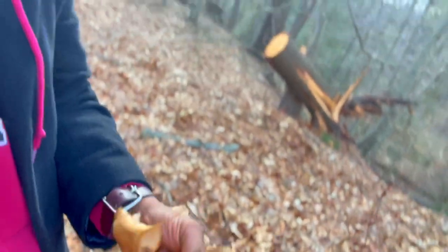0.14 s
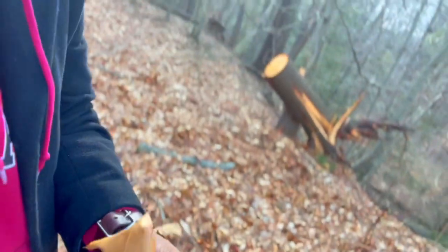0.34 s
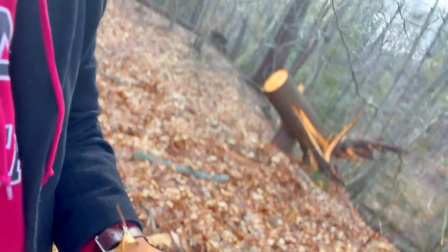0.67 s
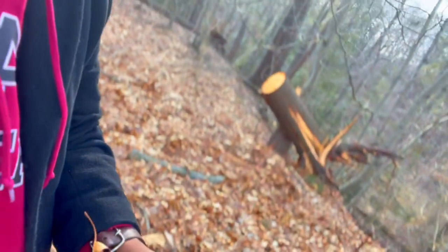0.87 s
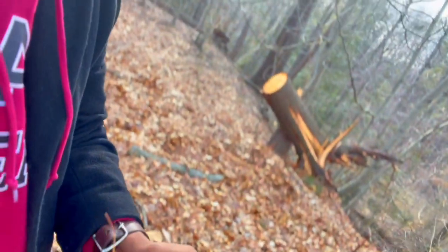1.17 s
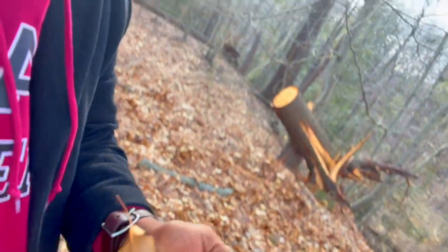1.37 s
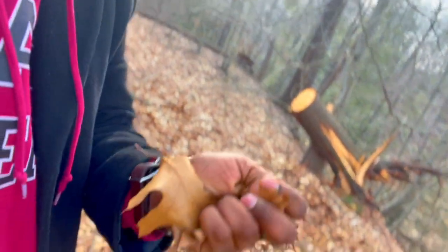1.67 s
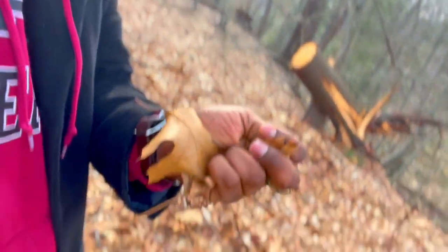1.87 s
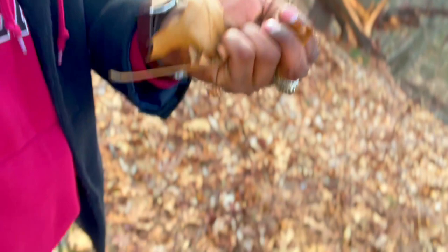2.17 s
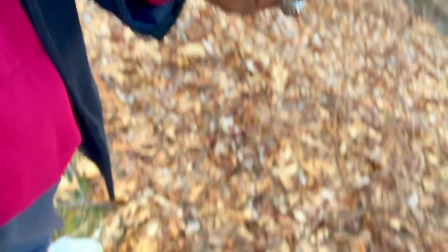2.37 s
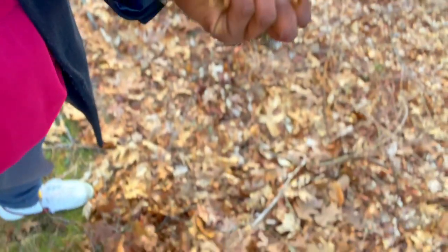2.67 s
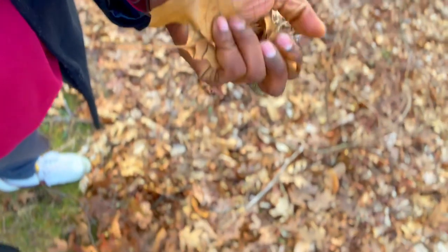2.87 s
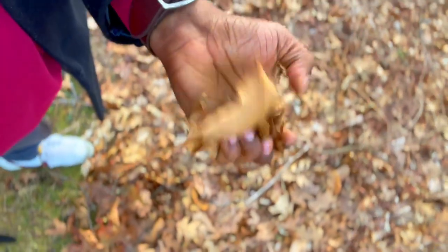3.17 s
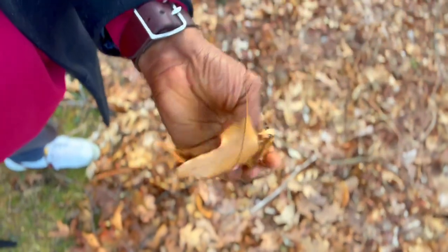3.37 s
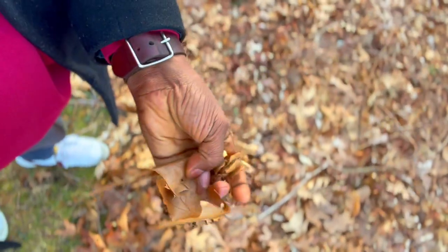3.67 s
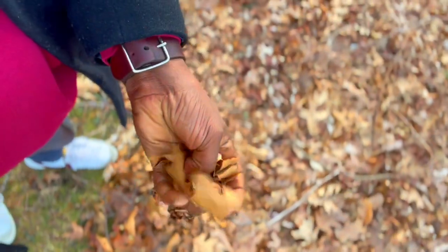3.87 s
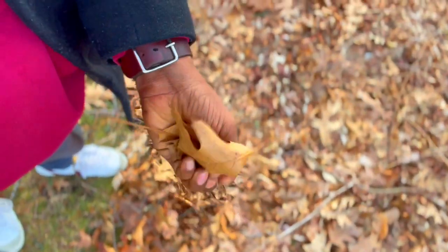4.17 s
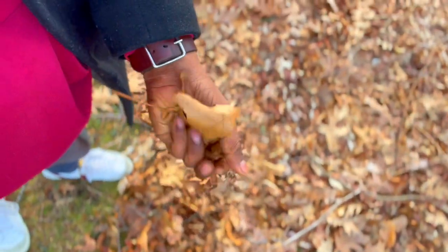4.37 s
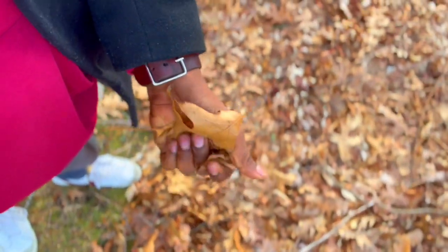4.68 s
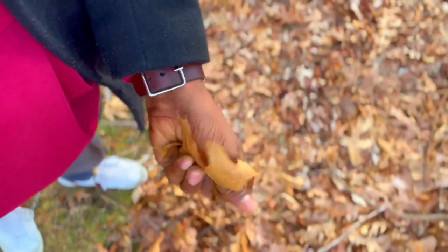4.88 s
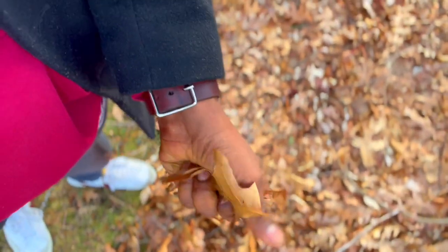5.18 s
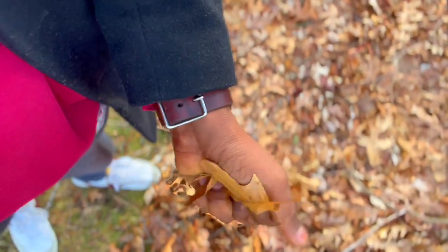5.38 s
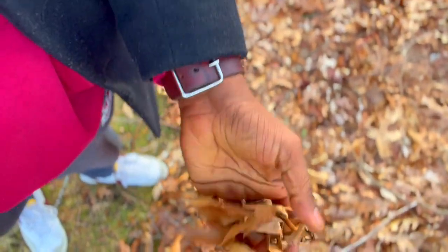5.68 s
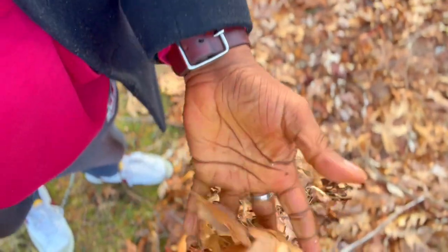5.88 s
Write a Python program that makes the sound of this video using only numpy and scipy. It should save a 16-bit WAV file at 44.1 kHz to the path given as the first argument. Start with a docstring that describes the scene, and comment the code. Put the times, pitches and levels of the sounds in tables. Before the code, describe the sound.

Dry leaves crunch and crackle in a squeezing hand close to the microphone, with sharp snaps and light wind rumbling and thumping outdoors.

```python
"""In a quiet wood, a hand crushes dry leaves about an arm's length from a pair of microphone ports.
Each press of the fingers brings a crunch: clumped noise bursts for breaking blade, noise for sliding flakes.
Ribs and creases give way in single snaps, bursts that ring a resonance; the wad knocks dully on the palm.
Light wind rumbles on the ports as low, lumpy noise, and buffets thump as short, uneven low swings.
Filtered noise makes the even hush of the wood; a faint, wavering low tone swells late and fades."""
import sys
import numpy as np
from scipy import signal
from scipy.fft import rfft, irfft
from scipy.io import wavfile
from scipy.ndimage import uniform_filter1d

SR = 44100
rng = np.random.default_rng(int(sys.argv[2]) if len(sys.argv) > 2 else 0)


def unload_audio(sound):
    """Save the sound as a 16-bit wav file, at the path given as the first command line argument."""
    columns = np.transpose(np.atleast_2d(sound))
    # keep every value between -1 and 1, then stretch to whole-number steps
    steps = np.round(np.clip(columns, -1, 1) * 32767)
    wavfile.write(sys.argv[1], SR, steps.astype(np.int16))


N = 266540
TIME = np.arange(N) / SR  # seconds
BINS = np.fft.rfftfreq(N, 1 / SR)  # Hz
EDGE_HZ = 16000  # upper limit of the band


def gain_of(db):
    """Decibels to amplitude."""
    return 10 ** (np.asarray(db) / 20)


def evened(x):
    """Scales to rms 1."""
    return x / np.sqrt(np.mean(x ** 2) + 1e-20)


def read(points, column=1):
    """One column of a spectrum table at every frequency bin, interpolated over log frequency."""
    table = np.array(points, float)
    return np.interp(np.log(BINS + 1), np.log(table[:, 0]), table[:, column])


def level(rows):
    """A dB curve as a gain at every sample."""
    return gain_of(np.interp(TIME, *np.transpose(rows)))


def coloured(x, points):
    """Gives x a spectrum, at rms 1."""
    return evened(irfft(rfft(x) * gain_of(read(points)), N))


def wander(hz):
    """Slow random drift of rms 1, up to about hz changes a second."""
    return evened(irfft(rfft(rng.standard_normal(N)) / (1 + (BINS / hz) ** 4), N))


def add(mix, s, sound):
    """Mixes a two-channel sound in at time s."""
    part = mix[:, max(round(s * SR), 0):][:, :sound.shape[1]]
    part += sound[:, :part.shape[1]]


def swells(steady, rows, shape):
    """A steady gain with bell-shaped swells (middle s, peak dB, half length s) added in power."""
    power = steady ** 2
    for s, db, half_s in rows:
        near = slice(*np.searchsorted(TIME, [s - 4 * half_s, s + 4 * half_s]))
        bell = np.exp(-abs((TIME[near] - s) / half_s) ** shape)
        power[near] += (gain_of(db) * bell) ** 2
    return np.sqrt(power)


def trees(db=-59):
    """The soft, even hush of the wood: steady noise with a fixed colour."""
    # Colour of the hush. Each row: frequency in Hz, relative level in dB.
    hush_colour = [(100, 19), (450, 15), (800, 12), (1400, 7), (4000, -49), (16000, -19)]
    return gain_of(db) * coloured(rng.standard_normal((2, N)), hush_colour)


def wind(db=0., lumps_db=2.0, deep_hz=70, shared=0.24, gust_shape=2.3):
    """Eddies rumble on each port almost separately; stronger wind brings larger, deeper ones."""
    # Colour of the rumble. Each row: frequency in Hz, relative level in dB.
    rumble_colour = [(12, -27), (20, -42), (53, -9), (75, -4.5), (179, -8), (256, -13.5), (287, -16.5),
                     (420, -40), (550, -27), (920, -120)]
    # The breeze at the ports, with a lull in the middle. Each row: time in seconds, level in dB.
    breeze = [(0, -44.5), (2.55, -43), (2.7, -50), (3.98, -52), (4.2, -46), (5.7, -43.5), (5.8, -49.5),
              (6.04, -54.5)]
    # Gusts on top of it. Each row: middle in seconds, peak in dB, half length in seconds.
    gusts = [(0.702, -39.5, 0.072), (1.083, -37, 0.11), (1.466, -41, 0.12), (2.43, -45, 0.053),
             (5.554, -38, 0.15), (5.712, -43, 0.023)]
    blowing = swells(level(breeze), gusts, gust_shape)
    spectrum = rfft(coloured(rng.standard_normal((2, N)), rumble_colour))
    light = evened(irfft(spectrum, N))
    deep = evened(irfft(spectrum / (1 + (BINS / deep_hz) ** 2), N))
    strength = blowing / blowing.max()
    eddies = (1 - strength) * light + strength * deep
    eddies /= np.sqrt(uniform_filter1d((eddies ** 2).mean(0), size=6000))
    # each port also hears a little of the other's eddies
    lumpy = (eddies + shared * eddies[::-1]) * gain_of(lumps_db * wander(19))
    return gain_of(db) * blowing * evened(lumpy)


def brief_dips(depth_db=-11, half_s=.011):
    """A gain that drops briefly at a few moments."""
    # Short dips in the crackle, in seconds.
    dip_times = [1.289, 1.848, 3.832, 3.982, 4.024, 4.71]
    return gain_of(depth_db * sum(np.exp(-((TIME - s) / half_s) ** 2) for s in dip_times))


def squeeze(uneven_db=1.6, slip_hz=32, grip_hollow_db=-10, press_shape=1.6):
    """How hard the hand works the outer flakes and the inner wad: grip plus presses, giving way unevenly."""
    # The grip that keeps the leaves crackling between presses. Each row: time in seconds, level in dB.
    grip = [(0, -50), (0.69, -47), (1.8, -39), (1.97, -47), (2.02, -57), (2.11, -50), (2.7, -45),
            (3.15, -49), (3.29, -52.5), (3.4, -44), (4.5, -44), (5.6, -41), (5.82, -53), (6.04, -49)]
    # One crunch for each press of the fingers, ahead of the flake and wad trims.
    # Each row: middle in seconds, peak in dB, half length in seconds, wad against flakes in dB.
    crunches = [(0.096, -37, 0.109, -9), (0.228, -41.0, 0.068, -9), (0.416, -38.5, 0.087, -5),
                (0.56, -34, 0.035, -11), (0.652, -37, 0.018, -10), (0.788, -29, 0.058, -9.5),
                (1.047, -36.5, 0.195, -9), (1.158, -29.0, 0.074, -15.5), (1.24, -27.5, 0.04, -8.5),
                (1.343, -29.0, 0.019, -13.5), (1.497, -34.5, 0.046, -30.5), (1.695, -34, 0.032, -33),
                (1.885, -33, 0.032, -11.5), (2.204, -42.5, 0.081, -12.5), (2.424, -44.5, 0.031, -17),
                (2.581, -29.5, 0.034, -8), (2.765, -36, 0.021, -9.5), (2.885, -34.5, 0.064, -8.5),
                (2.989, -29, 0.039, -9), (3.109, -30, 0.054, -8), (3.216, -31.5, 0.022, -8.5),
                (3.463, -36.0, 0.091, -4.5), (3.667, -34.5, 0.056, -7), (3.752, -22.5, 0.021, -7.5),
                (3.905, -34.5, 0.055, -7), (4.004, -30.5, 0.013, -30), (4.117, -37, 0.097, -8.5),
                (4.239, -31.5, 0.011, -9.5), (4.437, -32, 0.117, -13), (4.557, -35, 0.182, -24),
                (4.807, -34.5, 0.078, -12.5), (4.949, -33, 0.08, -13.5), (5.135, -28, 0.054, -15.5),
                (5.25, -31, 0.086, -13), (5.415, -35, 0.078, -9.5), (5.506, -30, 0.026, -6),
                (5.621, -31.5, 0.02, -12), (5.737, -43.5, 0.052, -6.5)]
    on_flakes = [(s, db, half_s) for s, db, half_s, _ in crunches]
    on_wad = [(s, db + hollow_db, half_s) for s, db, half_s, hollow_db in crunches]
    # press_shape: 1 swells to a point, 2 to a round bell
    flake = swells(level(grip), on_flakes, press_shape)
    wad = swells(gain_of(grip_hollow_db) * level(grip), on_wad, press_shape)
    slipping = brief_dips() * gain_of(uneven_db * wander(slip_hz))
    return flake * slipping, wad * slipping


def fracture(rise_s, fall_s, count=1, size=512):
    """Cracks run through the leaf: tiny bursts that swell to their middle and die, one version for each port."""
    t = (np.arange(size) - size // 2) / SR
    burst = rng.standard_normal((count, 2, size)) * np.exp(np.minimum(t / rise_s, -t / fall_s))
    return burst / np.linalg.norm(burst, axis=-1, keepdims=True)


def flakes(count, rise_s=.00027, fall_s=.00028, peak_db=10, octaves=.45, size=512):
    """Small fractures, each lifted around the resonance of its own flake."""
    hz = np.exp(rng.uniform(np.log(1000), np.log(16000), (count, 1, 1)))
    away = np.log2((np.fft.rfftfreq(size, 1 / SR) + 1) / hz) / octaves
    return irfft(rfft(fracture(rise_s, fall_s, count=count)) * gain_of(peak_db * np.exp(-away ** 2)))


def crackle(effort, count, spread_db, clump, rustle_db=0):
    """Clumps of small fractures of all sizes, with flakes rustling between them; its level is evened over time."""
    # Sliding rustle against separate fractures, low where the leaves only tick and break.
    # Each row: time in seconds, level in dB ahead of the rustle trim.
    sliding = [(0, 1.5), (1.25, 0.5), (1.4, -5), (2.6, -5), (3.1, -1), (3.76, -0.5), (3.86, -0.5), (4.5, 2),
               (6, -3.5)]
    bunching = np.exp(clump * wander(110))
    work = np.cumsum(bunching * np.sqrt(effort))  # a harder squeeze breaks more flakes a second
    times = np.interp(rng.random(count) * work[-1], work, TIME)
    sizes = gain_of(spread_db * np.minimum(rng.exponential(1, count), 3.2))
    grains = np.zeros((2, N))
    for s, strength, grain in zip(times, sizes, flakes(count)):
        add(grains, s - grain.shape[1] / 2 / SR, strength * grain)
    rustle = evened(rng.standard_normal((2, N)) * np.sqrt(bunching))
    sound = evened(grains) + gain_of(rustle_db) * level(sliding) * rustle
    # the hand does work at a steady pace, so the sound around a large break is weaker
    power = uniform_filter1d((sound ** 2).mean(0), size=1500)
    return sound / np.sqrt(uniform_filter1d(power, size=900))


def moving_colour(x, octaves=0.11, lower_share=0.6, dip_octaves=0.24, dip_below=0.47, fidget=0.025, size=256):
    """Two moving resonances an octave apart colour the crackle, with a moving dip or rise in level between."""
    # How the colour moves; a negative lift lowers the level, a negative dip raises it.
    # Each row: time in seconds, upper resonance in Hz, its lift in dB, depth of the dip below it in dB.
    resonances = [(0.2, 2200, 3, -1), (0.462, 2500, 6, 2), (0.55, 3140, 9.5, -11), (0.8, 2700, 4.5, -6.5),
                  (1.55, 1870, 5, 7.5), (2.1, 1950, 2, 6), (2.3, 3320, 9.5, -5), (3.1, 3330, -21, 15.5),
                  (3.55, 2830, 9.5, 7), (3.93, 3060, 5, -1.5), (4.35, 4100, -0.5, 14),
                  (4.9, 3470, 1, -13.5), (5.65, 3400, 5.5, 31), (5.85, 3510, 3, -2.5)]
    overlap = size - size // 4
    f, t, z = signal.stft(x, SR, nperseg=size, noverlap=overlap)
    s, *columns = np.transpose(resonances)
    hz, lift_db, dip_db = (np.interp(t, s, column) for column in columns)
    upper_hz = hz * np.exp(fidget * np.interp(t, TIME, wander(14.5)))
    away = np.log2((f[:, None] + 1) / upper_hz)  # octaves
    lifts = np.exp(-(away / octaves) ** 2) + lower_share * np.exp(-((away + 1) / octaves) ** 2)
    dip = np.exp(-((away + dip_below) / dip_octaves) ** 2)
    shaped = z * gain_of(lift_db * lifts - dip_db * dip)
    return signal.istft(shaped, SR, nperseg=size, noverlap=overlap)[1][:, :N]


def ring(hz, damping, tilt_db, f):
    """A piece of leaf radiates little below its lowest resonance, and rises or falls in level above it."""
    r = f / hz
    return r ** 2 / (1 - r ** 2 + 1j * damping * r) * gain_of(tilt_db * np.log2(np.maximum(r, 1)))


def struck(s, energy_db, crack, hz, damping, tilt_db):
    """A crack centred on time s rings a piece of leaf: start time and sound."""
    size = crack.shape[1]
    f = np.fft.rfftfreq(size, 1 / SR)
    push = rfft(crack)
    # a crack pushes evenly; the piece gives the colour
    push /= np.sqrt(uniform_filter1d(abs(push) ** 2, size=14, axis=1))
    sound = irfft(push * ring(hz, damping, tilt_db, f) / (1 + (f / EDGE_HZ) ** 20))
    # energy worth rms 1 over 1 ms
    sound *= np.sqrt(SR / 1000) / np.linalg.norm(sound, axis=1, keepdims=True)
    return s - size // 2 / SR, gain_of(energy_db) * sound


def snaps(db=-0.8, rise_s=.00045, fall_s=.00055, damping=.75, typical_db=-14, stretch=.25,
          tick=.65, tick_s=.00008):
    """Each break of a rib or crease rings its own piece of leaf; a larger crack runs longer, with a sharp tick."""
    # The loudest ribs and creases that break. Each row: time in seconds, energy in dB over 1 ms ahead of
    # the common trim, lowest resonance of the piece in Hz, brightness in dB per octave.
    breaks = [(0.128, -35, 3870, -7.5), (0.228, -15, 2190, 4.5), (0.361, -20, 1190, -2.5),
              (0.4045, -12.5, 1190, 1), (0.4415, -23, 1820, 5), (0.4608, -11, 1990, -3),
              (0.52, -18.5, 2070, -1), (0.538, -18.5, 924, 3.5), (0.5564, -20, 3220, 1),
              (0.564, -20, 3370, -7), (0.6525, -19.5, 2010, 5), (0.7145, -27, 8260, -6),
              (0.769, -13, 1740, 0), (0.8018, -15.5, 1070, 0), (0.82, -10.5, 2780, 0),
              (0.8446, -19, 2800, 1), (1.0916, -22, 2650, 1), (1.117, -25, 2650, 7),
              (1.134, -13.5, 2870, 4.5), (1.187, -12, 4050, 5), (1.2705, -16.5, 950, 2),
              (1.351, -22, 7250, -16), (1.5084, -20, 2650, 6), (1.516, -22, 3520, 2),
              (1.5777, -19.5, 8900, -12), (1.6042, -19.5, 2530, -1), (1.732, -19, 3690, 5),
              (1.7615, -26, 2070, 0.5), (1.8581, -13, 2300, 5.5), (1.881, -18.5, 4840, -5),
              (2.276, -26.5, 2910, 0.5), (2.5647, -13.5, 1300, 5.5), (2.5796, -22, 5900, -7),
              (2.6546, -24, 4500, 5), (2.9591, -17, 4700, -0.5), (3.0033, -19, 940, 9),
              (3.4998, -15, 2200, 1.5), (3.5941, -24.5, 3000, 1), (3.85, -22, 980, 0.5),
              (3.8536, -15.5, 5660, -0.5), (3.8656, -13.5, 900, 9), (3.9344, -13.5, 4120, 1),
              (3.9941, -18, 5100, -8.5), (3.9999, -26, 5120, -3), (4.2327, -18.5, 5200, 1),
              (4.3449, -20.5, 900, 8), (4.445, -22, 3520, 3), (4.4566, -20, 5100, -15),
              (4.5572, -17, 3860, 4), (4.6887, -22.5, 4200, -3.5), (4.7332, -22, 5770, -4),
              (4.7774, -14.5, 2300, 5.5), (4.8404, -24, 1000, 1.5), (4.865, -15, 3270, 0.5),
              (4.891, -15.5, 4440, -2), (4.9319, -7.5, 6300, -7), (4.9856, -24, 900, 7),
              (5.0092, -25, 4170, -2.5), (5.013, -25, 4200, 2), (5.0788, -22, 5400, -6),
              (5.1228, -16, 5370, 2.5), (5.1295, -9.5, 5000, 3), (5.149, -6.5, 4400, -3),
              (5.1599, -13.5, 3660, -5), (5.1807, -16, 7160, -20), (5.1887, -16.5, 5630, -7),
              (5.1975, -17, 3950, -3), (5.222, -15.5, 1760, 5), (5.437, -18.5, 1200, 0.5),
              (5.4887, -25, 5730, -12)]
    out = np.zeros((2, N))
    for s, energy_db, hz, tilt_db in breaks:
        length = gain_of(stretch * (energy_db - typical_db))
        crack = fracture(rise_s * length, fall_s * length)[0] + tick * fracture(tick_s, tick_s)[0]
        add(out, *struck(s, energy_db + db, crack, hz, damping, tilt_db))
    return out


def thumps(uneven_turns=0.11, size=8192):
    """Each buffet of air pushes the diaphragms through a few uneven swings."""
    # Buffets that thump on the ports.
    # Each row: middle in seconds, peak in dB, centre frequency in Hz, length in seconds.
    buffets = [(0.95, -25.5, 103, 0.0066), (1.124, -28.5, 67, 0.011), (1.203, -33, 67.6, 0.02),
               (2.017, -32, 69.5, 0.023), (2.183, -25.5, 92.5, 0.011), (2.265, -33, 63.5, 0.022),
               (2.46, -20.5, 86, 0.0081), (3.1, -27, 88, 0.007), (5.174, -30.5, 82, 0.008),
               (5.452, -27.5, 115, 0.0073), (5.53, -25, 155, 0.013), (5.557, -23, 80.6, 0.0059)]
    out = np.zeros((2, N))
    t = (np.arange(size) - size // 2) / SR
    stagger = uneven_turns * wander(56)
    port_turns = np.array([[0], [1 / 4]])  # a quarter turn between the ports
    for s, db, hz, length_s in buffets:
        turns = hz * t + np.interp(s + t, TIME, stagger) + rng.random() + port_turns
        swing = np.sin(2 * np.pi * turns)
        add(out, s - size // 2 / SR, gain_of(db) * swing * np.exp(-abs(t / length_s) ** 0.68))
    return out


def knocks(hz=620, damping=1.0, tilt_db=-9.0, cave_s=0.00082):
    """The wad caves in and gives the palm a short, dull knock."""
    # Cave-ins of the wad. Each row: time in seconds, energy in dB over 1 ms.
    cave_ins = [(1.271, -30.5), (2.565, -35.5), (3.503, -32.5), (4.865, -37), (4.934, -40)]
    out = np.zeros((2, N))
    for s, energy_db in cave_ins:
        add(out, *struck(s, energy_db, fracture(cave_s, cave_s)[0], hz, damping, tilt_db))
    return out


def leaves(crisp_db=-1.0, hollow_db=1.8):
    """Fractures sound bright in the outer flakes and hollow inside the wad; a moving colour shapes both."""
    # Colours of the outer flakes and of the wad. Each row: frequency in Hz, relative level in dB.
    flake_colour = [(900, -28), (2200, -58), (3200, -4), (6300, 3), (8500, 2), (11200, -1.5), (13300, 1.5),
                    (16000, -1.5)]
    wad_colour = [(200, -8), (450, -8), (800, -7), (1400, -2.5), (2100, -3), (3000, 0.5), (5000, -8)]
    on_flakes, on_wad = squeeze()
    outer = crackle(on_flakes, count=1900, spread_db=3.5, clump=0.7)
    inner = crackle(on_flakes, count=1800, spread_db=3.5, clump=.5, rustle_db=4.0)
    crisp = gain_of(crisp_db) * on_flakes * coloured(outer, flake_colour)
    hollow = gain_of(hollow_db) * on_wad * coloured(inner + 0.55 * outer, wad_colour)
    return moving_colour(crisp + hollow) + snaps() + knocks()


def drone(hz=93, waver=0.026):
    """A low tone that swells, wavers in pitch and fades."""
    # The faint drone. Each row: time in seconds, level in dB.
    drone_level = [(3.9, -73), (4.25, -47), (4.7, -48), (4.95, -51.5), (5.3, -81)]
    turns = np.cumsum(hz * (1 + waver * wander(8.0))) / SR
    return level(drone_level) * evened(np.sin(2 * np.pi * turns))


def surroundings(x, db, t60, size=4096):
    """Hand, coat and ground scatter a short, faint tail of sparse random echoes."""
    t = np.arange(size) / SR
    sparse = (rng.random((2, size)) < .06) * (t > .001)
    taps = rng.standard_normal((2, size)) * sparse * gain_of(-60 * t / t60)
    taps /= np.linalg.norm(taps, axis=1, keepdims=True)
    return x + gain_of(db) * signal.oaconvolve(x, taps, axes=1)[:, :N]


def reaching(at_hip, held_out, reach_s=1.564):
    """Blends from one sound to the other as the hand moves out, around reach_s."""
    reach = np.clip((TIME - reach_s) * 10 + .5, 0, 1)
    return (1 - reach) * at_hip + reach * held_out


def ports(x, right_db=0.56, sway_radians=0.37):
    """The two ports hear a shared part and a part of their own; the right one's phase shifts as the hand moves."""
    # Likeness of the two ports. Each row: frequency in Hz, coherence from 0 to 1.
    likeness = [(100, 0.33), (600, 0.21), (1500, 0.95), (3100, 1), (5500, 0.15), (8000, 0.97),
                (10500, 0.92), (12300, 0.87), (16000, 1)]
    # How far the left port leads. Each row: frequency in Hz, then the lead in radians with the hand
    # at the hip, with it held out, and with it lowered.
    left_lead = [(450, 0.5, 0.5, -0.44), (1410, -0.55, 1.54, 0.3), (2164, 1.38, -4, -2.5),
                 (3390, -2.02, -1.5, -2.5), (5100, -1.5, -6, -3.5), (8270, -2.5, -3, -2.5),
                 (12680, -0.7, 1.33, -0.53), (13150, -0.3, -0.4, -1), (14200, 3.5, 3.5, 3.5)]
    # When the hand hangs low over the ground: from and until, in seconds.
    low_from, low_until = (3.35, 4.95)
    left, own = rfft(x)
    same = np.clip(read(likeness), 0, 1)
    right = irfft(same * left + np.sqrt(1 - same ** 2) * own, N)
    sway = np.exp(1j * sway_radians * wander(23))
    right = rfft((signal.hilbert(right) * sway).real)
    at_hip, held_out, lowered = (irfft(right * np.exp(-1j * read(left_lead, column=k)), N) for k in (1, 2, 3))
    low = np.clip(np.minimum(TIME - low_from, low_until - TIME) * 10 + .5, 0, 1)
    placed = (1 - low) * reaching(at_hip, held_out) + low * lowered
    return np.array([x[0], gain_of(right_db) * placed])


def scene():
    """Leaves and air, as the two ports hear them."""
    crushing = surroundings(leaves(), db=-14, t60=.04)
    return ports(crushing + trees() + thumps()) + wind() + drone()


def record(dry):
    """The recorder softly rounds off the highest peaks and limits the band."""
    ceiling = .65  # of full scale, ahead of the band limit
    rounded = ceiling * np.tanh(dry / ceiling)
    lowpass = signal.firwin(511, EDGE_HZ, window=("kaiser", 9), fs=SR)
    return signal.oaconvolve(rounded, lowpass[None], "same", axes=1)


dry = scene()
out = record(dry)
unload_audio(out)
```